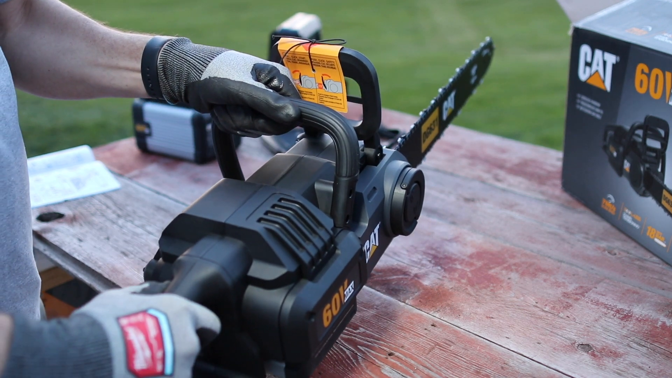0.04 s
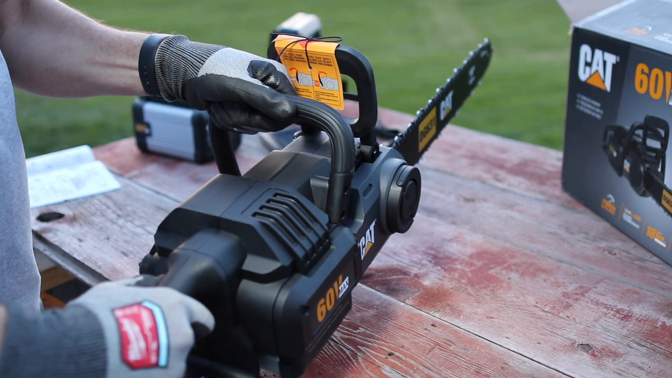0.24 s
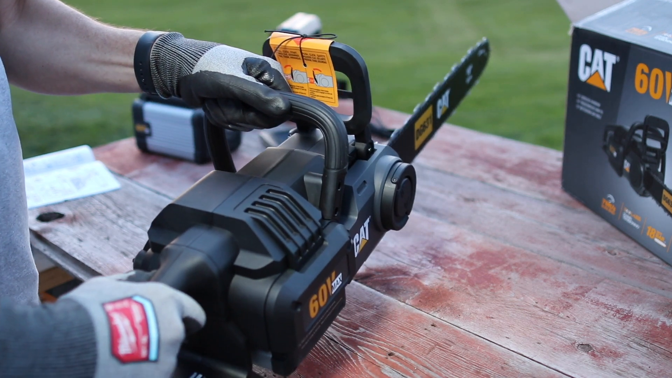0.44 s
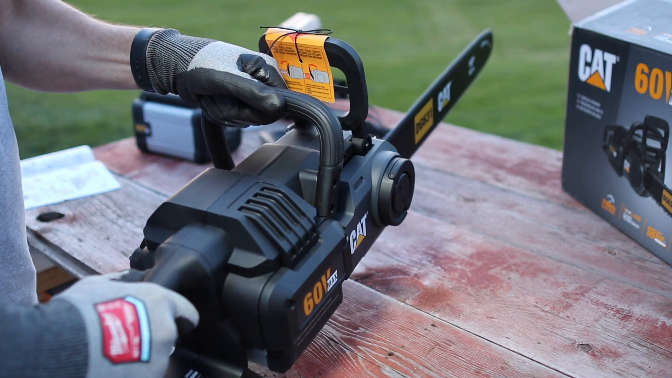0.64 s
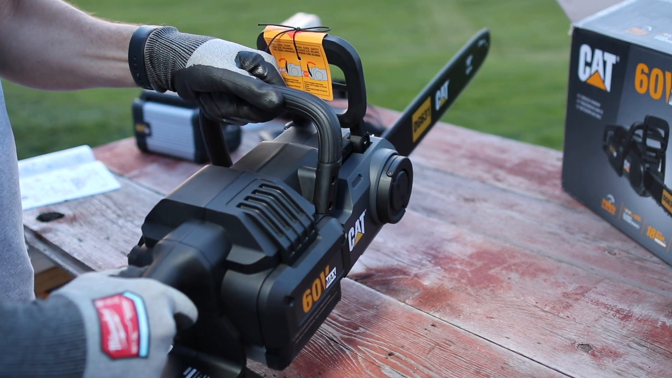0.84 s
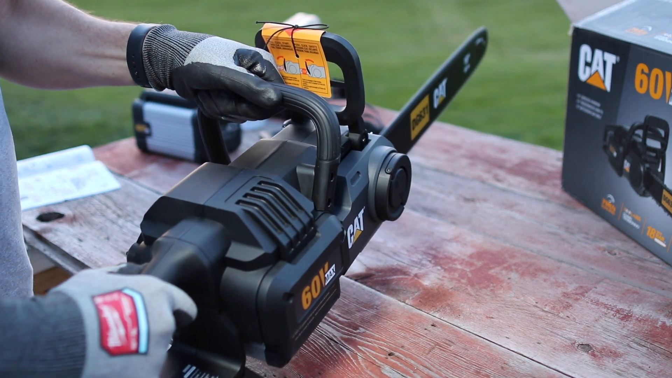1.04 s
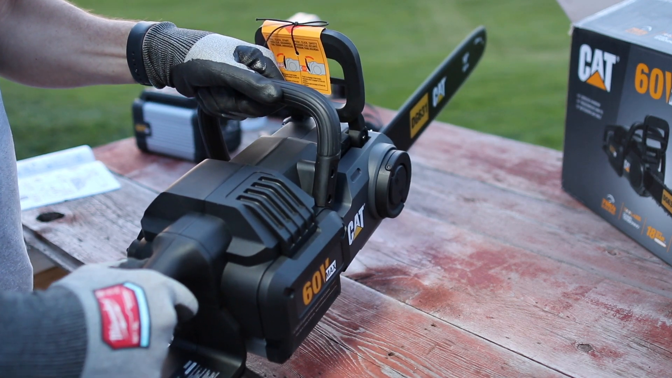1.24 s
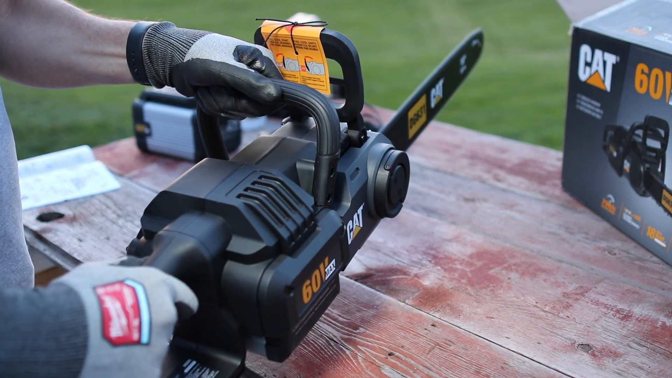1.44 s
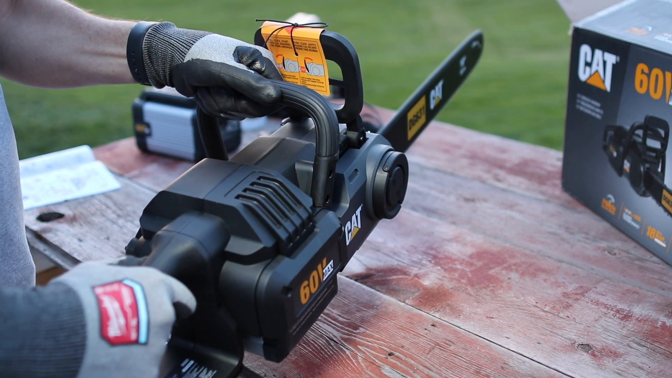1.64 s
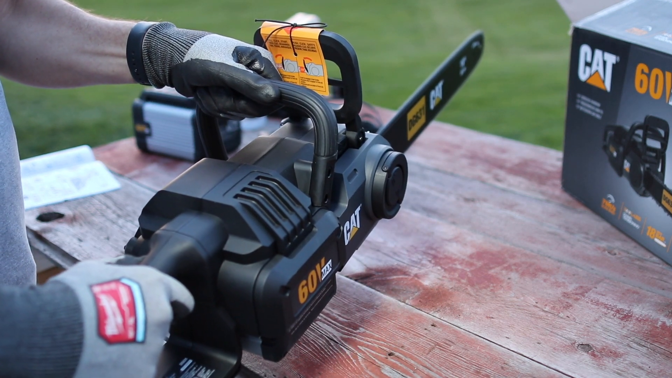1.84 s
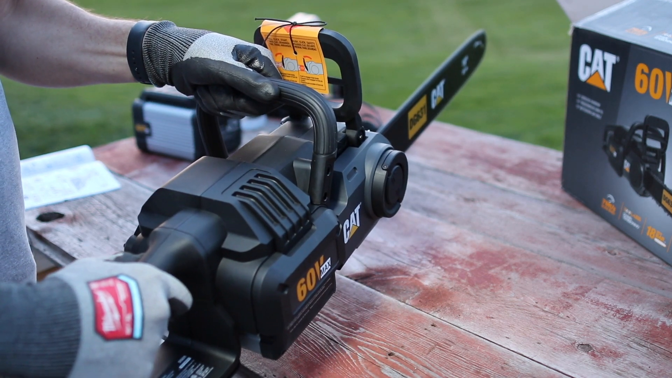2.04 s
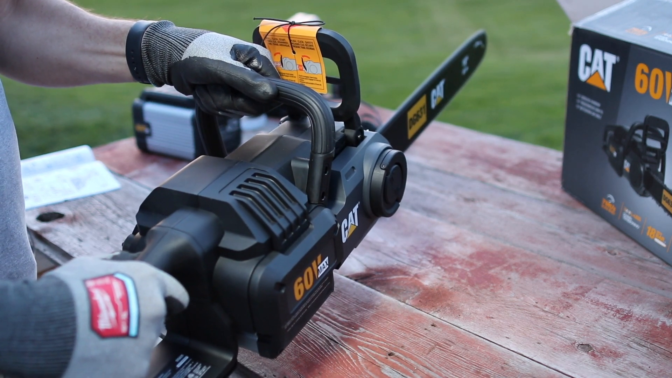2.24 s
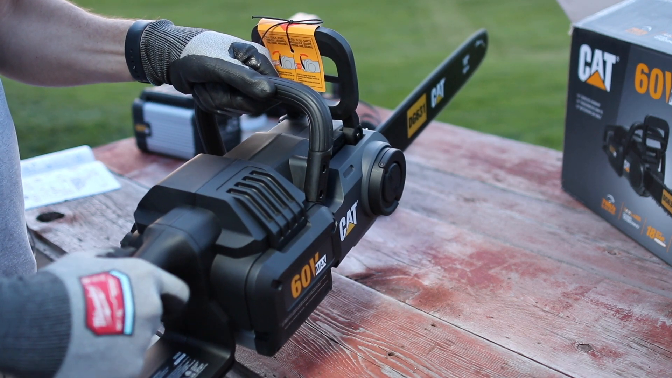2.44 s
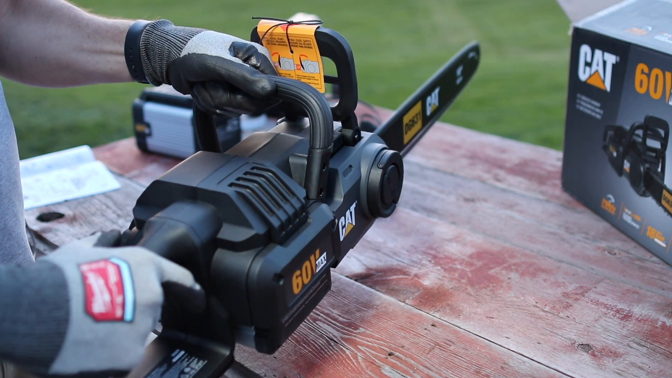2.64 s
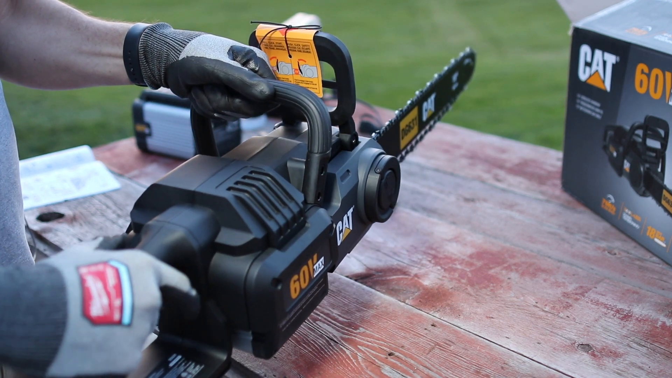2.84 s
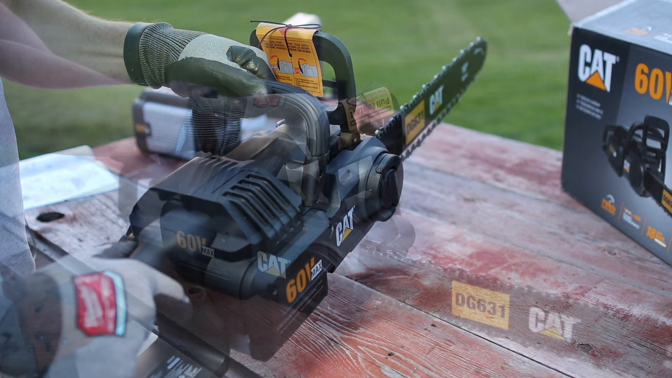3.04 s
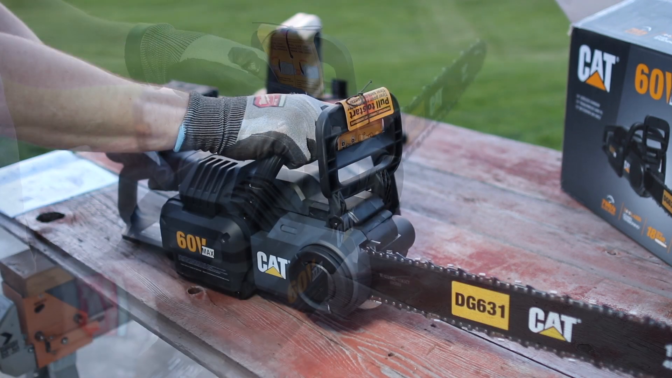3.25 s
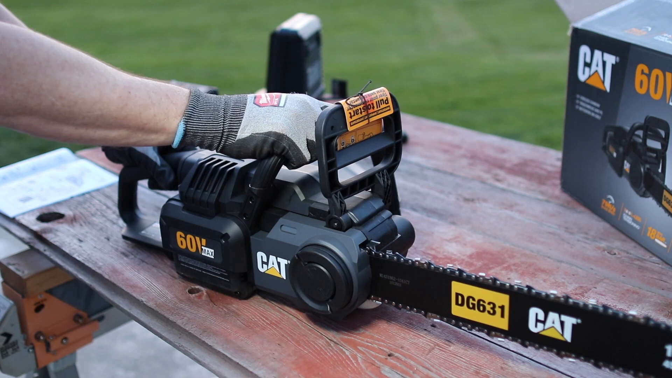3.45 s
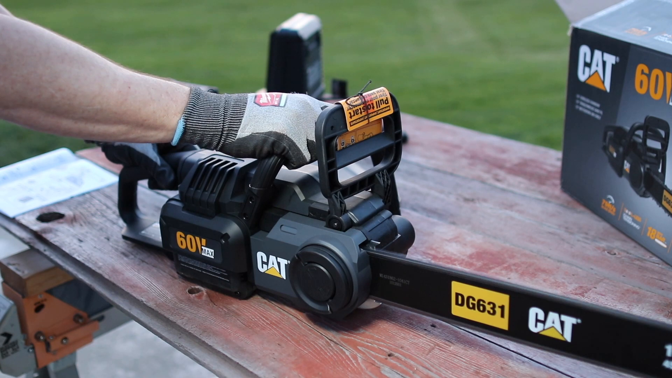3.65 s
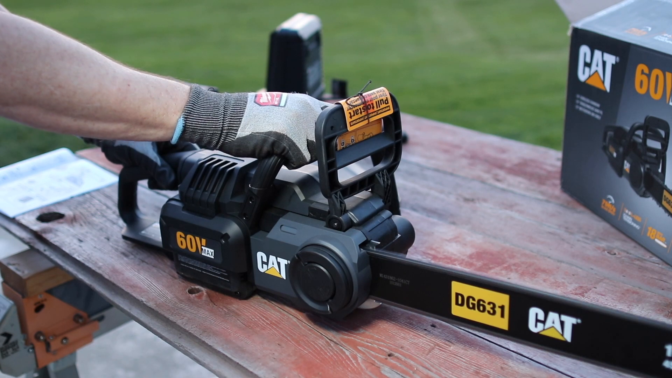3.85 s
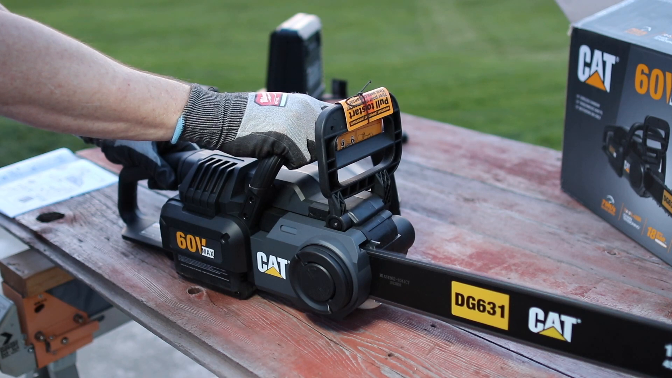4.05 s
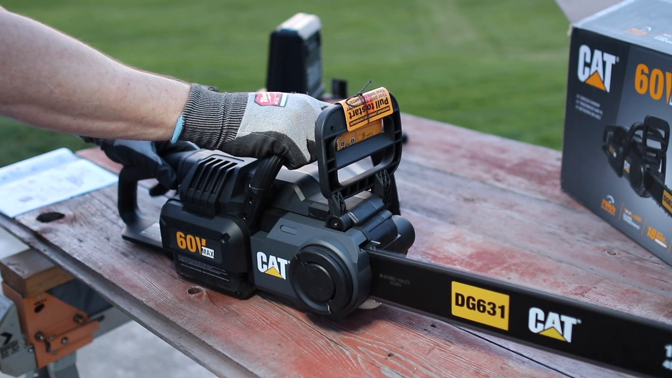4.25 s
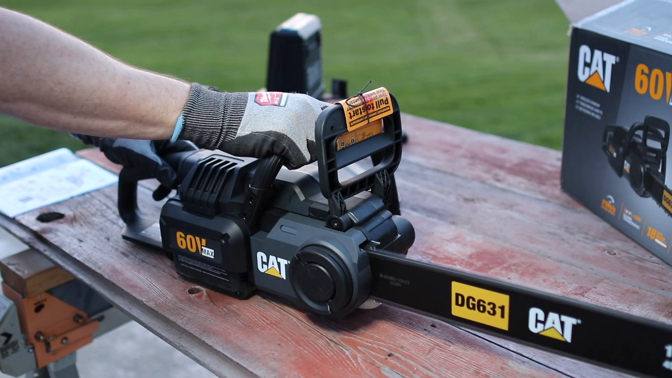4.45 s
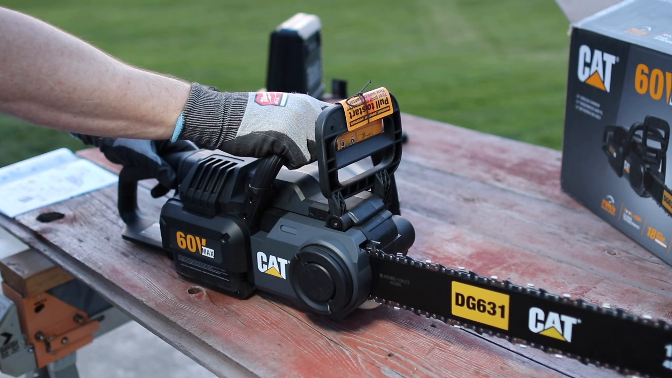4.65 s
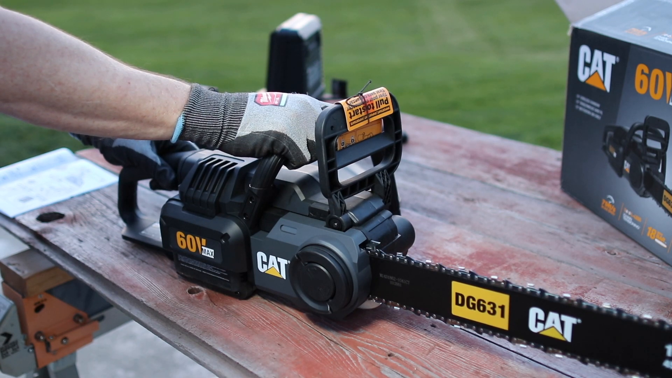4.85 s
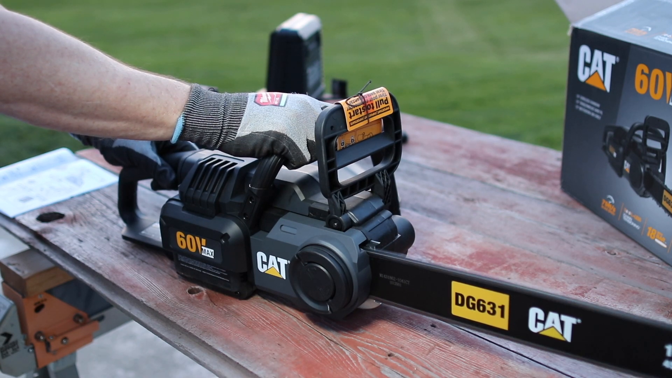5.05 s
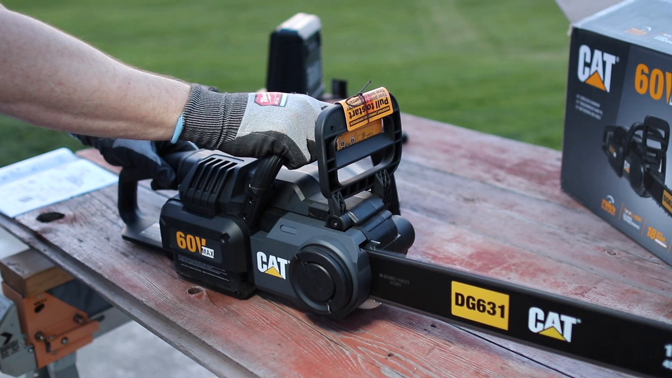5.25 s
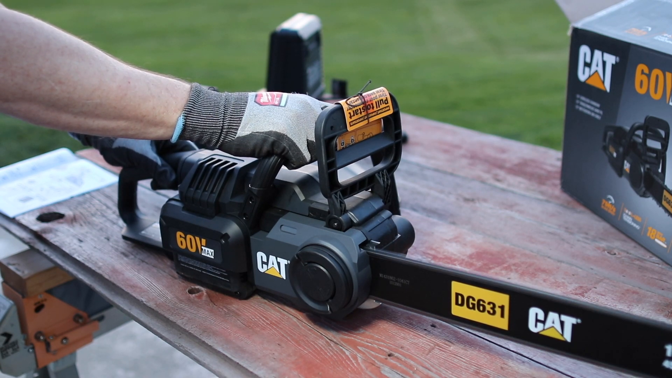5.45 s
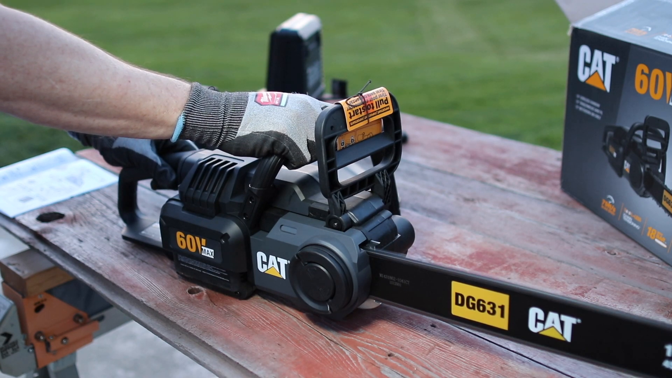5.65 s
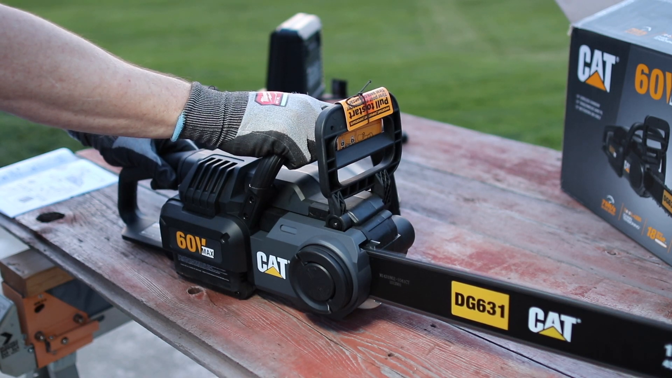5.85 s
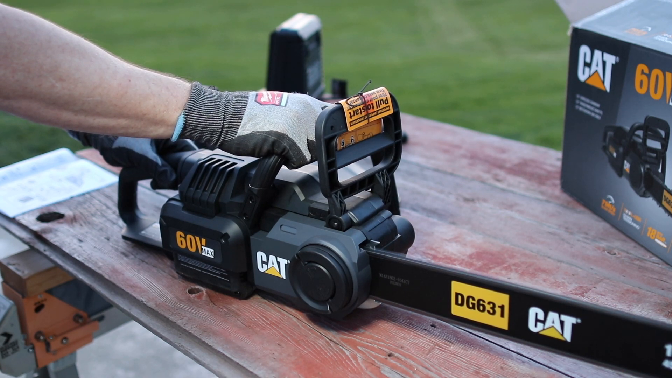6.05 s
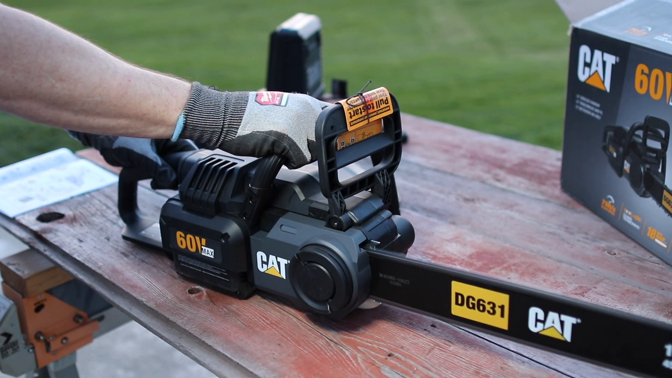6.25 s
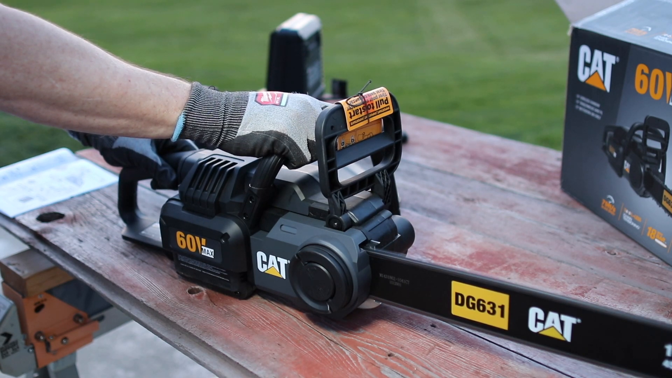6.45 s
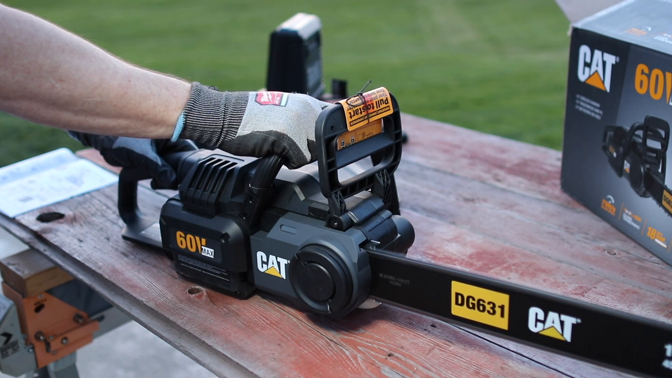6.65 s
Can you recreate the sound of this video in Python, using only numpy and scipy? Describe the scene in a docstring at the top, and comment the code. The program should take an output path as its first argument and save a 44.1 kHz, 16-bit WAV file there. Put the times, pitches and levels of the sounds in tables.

```python
"""Cloth rustle and clicks of catch and trigger, with faint far calls over a quiet yard, open the scene.
A cordless chainsaw on a wooden garden table then runs three times without cutting, heard once from
behind, then twice from the side. Timed link contacts make the rattle, filtered noise the sliding hiss, and
sines the sprocket tones and the motor's whine under drive and braking. Knocks are noise bursts through the
housing's resonances; bar and table ring after each stop, and a dull yard echo follows the saw."""
import sys
import numpy as np
from scipy import signal
from scipy.fft import rfft, irfft
from scipy.io import wavfile
from scipy.ndimage import uniform_filter1d

SR = 44100
rng = np.random.default_rng(int(sys.argv[2]) if len(sys.argv) > 2 else 0)


def digitize_waveform(pressure):
    """Quantize a signal to 16-bit integers and store it at the path in sys.argv[1].

    Rows of a 2-D input are taken as channels; values are limited to [-1, 1].
    """
    field = np.atleast_2d(pressure).T
    bounded = np.clip(field, -1, 1)
    quanta = np.round(bounded * 32767).astype(np.int16)
    wavfile.write(sys.argv[1], SR, quanta)


N = 295853
TIME = np.arange(N) / SR  # s
FREQ = np.maximum(np.arange(2049) * SR / 4096, 1)  # Hz, the grid of every response

LINKS, SPROCKET_TEETH = 62, 6  # drive links in the loop, teeth on the sprocket
SLOT_ORDER = 42  # slot whine, as a multiple of the shaft speed
YARD_DB = -57  # mean level of the open-air background
TOP_HZ = 15850  # upper limit of the recorder
KNOCK_T60_S = 0.035  # decay of the middle band of a knock

# The motor heads for its free speed until held at the top; on release it brakes to a set speed, then coasts.
# All speeds are link rates.
FREE_HZ, SPIN_UP_S, BRAKE_HZ_PER_S, BRAKE_OFF_HZ, SPEED_EASE_S = 3247, 1.55, 3950, 870, 0.05
# The chain creeps before it bites, settles as it runs, quietens as it coasts and dies away once it stops.
CREEP_S, CREEP_DB, SETTLE_DB_PER_S, COAST_DB_PER_S, STOP_DB_PER_S = 0.032, -13, -1.0, -44.5, -550
HISS_SLACK_DB = -1.5  # a slow, loose chain slides more softly

# Resonances of the plastic housing. Each row: centre in Hz, width in Hz, height in dB.
HOUSING_MODES = [(343, 79, 5), (760, 140, 3.5), (986, 160, 2.5), (1327, 170, 5.5), (1900, 180, 3),
                 (2965, 440, 4), (4600, 440, 6.5), (6440, 700, 4)]
# Broad colour of the housing. Each row: frequency in Hz, relative level in dB.
HOUSING_COLOUR = [(50, -12.5), (170, -13.5), (330, -0.5), (700, 2.5), (1000, 6), (2500, -1), (6000, -13),
                  (8500, -20), (15000, -29)]


def undb(db):
    """Decibels to gain."""
    return 10 ** (np.asarray(db) / 20)


def rms(x):
    """Root mean square."""
    return np.sqrt(np.mean(x ** 2)) + 1e-12


def band(x, lo, hi):
    """Steep band-pass from lo to hi in Hz."""
    sos = signal.butter(4, [lo, min(hi, .45 * SR)], "band", fs=SR, output="sos")
    return signal.sosfilt(sos, x)


def walk(rate):
    """Smooth random wandering with a spread near 1, fed by `rate` new values a second."""
    k = int(SR / rate)
    steps = np.repeat(rng.standard_normal(N // k + 1), k)
    slow = uniform_filter1d(uniform_filter1d(steps, k), k)[:N]
    return slow / rms(slow)


def after(s, ramp_s):
    """A smooth step from 0 to 1 around time s."""
    return .5 + .5 * np.tanh((TIME - s) / ramp_s)


def add(out, s, sound):
    """Mix a short sound in at time s."""
    i = int(s * SR)
    out[i:i + len(sound)] += sound[:N - i]


def response(slope, modes=()):
    """A broad slope with resonance bumps and notches on it, in dB at each of FREQ."""
    hz, db = np.transpose(slope)
    bumps = sum(height / (1 + (2 * (FREQ - centre) / width) ** 2) for centre, width, height in modes)
    return np.interp(np.log(FREQ), np.log(hz), db) + bumps


def colour(x, db):
    """Causal filter with the given response, built from its cepstrum."""
    cepstrum = irfft(np.log(undb(db)))
    # folding the cepstrum forward gives minimum phase
    cepstrum[1:len(FREQ) - 1] *= 2
    cepstrum[len(FREQ):] = 0
    impulse = irfft(np.exp(rfft(cepstrum)))
    return signal.fftconvolve(x, impulse)[:len(x)]


def rustles():
    """Gloves and sleeves rub on the handles: soft swells of coloured noise."""
    # Shifts of the grip. Each row: centre in seconds, half length in seconds, level in dB.
    swells = [(0.083, 0.225, -49), (0.415, 0.0536, -48.5), (3.22, 0.085, -51), (3.4, 0.18, -57.5)]
    # Spectrum of the cloth. Each row: frequency in Hz, relative level in dB.
    cloth_slope = [(30, 2.5), (100, -4), (500, -10), (1400, -12.5), (2200, -17), (4000, -18), (6000, -29),
                   (16000, -30.5)]
    cloth = colour(rng.standard_normal(N), response(cloth_slope))
    swell = sum(undb(db) * np.exp(-((TIME - s) / half) ** 2) for s, half, db in swells)
    return cloth / rms(cloth) * swell


def yard(waver=0.019):
    """Outdoor air is coloured noise of wandering level; distant calls are gliding, wavering sines."""
    # Spectrum of the open air. Each row: frequency in Hz, relative level in dB.
    yard_slope = [(15, -28), (25, -5), (49, -4.5), (82, -2.5), (157, -5), (263, -8), (489, -9),
                  (1020, -13.5), (1190, -10), (2050, -20), (4140, -23), (5730, -28), (16000, -33.5)]
    # Far birds and other faint distant tones.
    # Each row: start in seconds, length in seconds, start pitch in Hz, end pitch in Hz, level in dB.
    calls = [(0.01, 0.2, 1420, 1380, -58), (0.07, 0.0363, 4400, 4000, -54.5),
             (0.319, 0.057, 4300, 4000, -55), (0.4, .04, 3950, 3750, -61), (2.92, .12, 162, 155, -54),
             (2.94, 0.32, 1090, 1300, -58.5), (2.948, 0.3, 2850, 3090, -66), (3.261, .035, 4400, 3850, -54),
             (3.427, 0.04, 4440, 3770, -51.5), (3.487, 0.028, 3650, 3950, -53)]
    air = colour(rng.standard_normal(N), response(yard_slope))
    out = air / rms(air) * undb(YARD_DB + 0.66 * walk(8.9))
    wobble = 1 + waver * walk(90)
    for s, length, start_hz, end_hz, db in calls:
        hz = np.linspace(start_hz, end_hz, int(length * SR))
        hz = hz * wobble[int(s * SR):][:len(hz)]
        tone = np.sin(2 * np.pi * np.cumsum(hz) / SR)
        add(out, s, undb(db) * np.sqrt(2) * np.hanning(len(hz)) * tone)
    return out


def knocks(rise_s=0.00012, treble_decay=0.73, bass_decay=1.2):
    """Each knock is a brief chatter of plastic parts ringing the housing; the treble dies first."""
    # Clicks of catch and trigger, and jolts as the drive takes up slack or brakes.
    # Each row: start in seconds, peak level in dB, bass in dB, treble in dB (both set against a middle at -11).
    jolts = [(0.157, -27.5, -7, -12), (0.182, -12, -14.5, -9.5), (0.193, -18, -18, -16.5),
             (0.212, -25, -28.5, -6), (0.454, -15, -16, 0), (0.459, -11, -25, -27),
             (0.465, -0.5, -10, -20.5), (0.505, -4, -29, -25), (2.544, -8, -26, -20),
             (2.62, -21.5, -7, -13), (2.833, -39, -7, -1.5), (2.883, -48, -15, -4), (2.93, -42, -18, -25.5),
             (3.069, -37.5, -31, -23), (3.19, -36, -13, -6), (3.197, -37, -12, -11),
             (3.239, -11.5, -32, -10.5), (3.512, -19, 8, 2), (3.516, -1, -17, -33), (3.539, -8.5, -16, -21),
             (4.789, -38, -13, -21.5), (4.825, -15.5, -24.5, -12), (4.836, -14.5, -23.5, -14.5),
             (4.933, -28, -19, -8), (4.943, -13.5, -4, -34), (4.989, -17, -18, -18)]
    out, t = np.zeros(N), TIME[:SR // 6]
    body = response(HOUSING_COLOUR, HOUSING_MODES)
    for s, peak_db, bass_db, treble_db in jolts:
        knock = 0
        bands = [(40, 680, bass_db, bass_decay), (700, 2630, -11, 1), (2900, 12500, treble_db, treble_decay)]
        for lo, hi, db, decay in bands:
            envelope = (1 - np.exp(-t / rise_s)) * np.exp(-np.log(1000) * t / (KNOCK_T60_S * decay))
            chatter = rng.standard_normal(len(t)) * envelope
            part = band(colour(chatter, body), lo, hi)
            knock = knock + undb(db) * part / rms(part)
        add(out, s, undb(peak_db) * knock / abs(knock).max())
    return out


def squeals(width_hz=450, buzz_db=-33):
    """The drive pulses the windings to find the rotor: a thin high squeal over a soft buzz of the housing."""
    # Squeals around each spin-up. Each row: start in seconds, length in seconds, pitch in Hz, level in dB.
    bursts = [(0.449, 0.056, 11860, -34), (3.509, 0.043, 11400, -42.5), (4.937, 0.0213, 11100, -59.5)]
    out = np.zeros(N)
    for s, length, hz, db in bursts:
        noise = rng.standard_normal(int(length * SR))
        squeal = band(noise, hz - width_hz / 2, hz + width_hz / 2)
        buzz = colour(noise, response(HOUSING_COLOUR, HOUSING_MODES))
        both = undb(db) * squeal / rms(squeal) + undb(buzz_db) * buzz / rms(buzz)
        add(out, s, both * signal.windows.tukey(len(noise), .2))
    return out


def radiation(slope, modes, bounce, bounce_ms):
    """The saw's response with the bounce off the table top, 0 dB in the rattle band."""
    comb = abs(1 + bounce * np.exp(-2j * np.pi * FREQ * bounce_ms / 1000))
    db = response(slope, modes) + 20 * np.log10(comb)
    return db - 20 * np.log10(rms(undb(db[(FREQ > 1400) & (FREQ < 3500)])))


def link_rate(start, release, top_hz, coast_hz_per_s):
    """Drive links passing the sprocket each second, and the moment when the brake lets go."""
    driven = np.minimum(FREE_HZ * (1 - np.exp(-(TIME - start) / SPIN_UP_S)), top_hz)
    brake_off = release + (top_hz - BRAKE_OFF_HZ) / BRAKE_HZ_PER_S
    braked = BRAKE_HZ_PER_S * (np.clip(TIME, release, brake_off) - release)
    coasted = coast_hz_per_s * np.maximum(TIME - brake_off, 0)
    hz = np.maximum(driven - (braked + coasted), 20)
    return uniform_filter1d(hz, int(SPEED_EASE_S * SR)), brake_off


def motor(hz, driving, braking, body, axis, slot_db, jitter=0.0045, inrush_db=7):
    """Slots whine under drive, most at low speed; braking orders sing as they fall through resonances."""
    # Braking whine, each order swelling at a resonance of the motor. Each row: multiple of the shaft speed,
    # resonance in Hz, half width in Hz, level from the rear in dB, level from the side in dB.
    brake_orders = [(6.015, 1080, 250, -33, -27.5), (13.93, 2613, 460, -23.5, -26),
                    (13.62, 2110, 150, -23.5, -16), (26.87, 4870, 250, -20.5, -37.5),
                    (26.3, 4050, 190, -24.5, -43.5), (34.64, 5450, 230, -24.5, -47),
                    (44, 6650, 230, -19.5, -40), (53.2, 7880, 280, -22, -49.5)]
    shaft = hz / SPROCKET_TEETH
    turn = 2 * np.pi * np.cumsum(shaft * (1 + jitter * walk(300))) / SR
    slots_db = slot_db + inrush_db * (1 - hz / hz.max()) + np.interp(SLOT_ORDER * shaft, FREQ, body)
    slots = undb(slots_db) * np.sin(SLOT_ORDER * turn)
    whine = 0
    for order, centre, half, *levels in brake_orders:
        swell = np.exp(-((order * shaft - centre) / half) ** 2)
        whine = whine + undb(levels[axis]) * swell * np.sin(order * turn)
    return np.sqrt(2) * (driving * slots + braking * whine)


def contacts(travel, scatter, count):
    """Each link ticks several times on its way round; the pattern returns every lap, scattered in size."""
    place = rng.uniform(0, LINKS, LINKS * count)
    habit = rng.standard_normal(len(place))
    laps = np.arange(int(travel[-1] / LINKS) + 1)[:, None]
    size = (habit + scatter * rng.standard_normal((len(laps), len(place)))).ravel()
    at = np.interp((place + LINKS * laps).ravel(), travel, np.arange(N))
    # share each tick between its two nearest samples
    first, part = at.astype(int), at % 1
    early = np.bincount(first, size * (1 - part), N + 1)
    late = np.bincount(first + 1, size * part, N + 1)
    return (early + late)[:N]


def chain(hz, on, body, hiss_db, slap_db, slap_hz, scatter, low_db):
    """Rattle of the links and their sliding hiss, with the rattle near 0 dB."""
    slack = 1 - hz / hz.max()
    travel = np.cumsum(hz * (1 + .0005 * walk(25))) / SR  # in links
    ticks = colour(contacts(travel, scatter, count=14) / np.sqrt(hz), body)
    rattle = band(ticks, 1400, 3700)
    low = undb(low_db) * band(ticks, 25, 1400)
    # a slow chain hangs loose and slaps the bar, which brings up its low resonances
    slaps = colour(contacts(travel, scatter, count=4) / np.sqrt(hz), body)
    slap = band(slaps, *slap_hz) * slack ** 1.1
    rattle = (rattle + low) / rms(rattle[on]) + undb(slap_db) * slap / rms(slap[on])
    # steel slides in the groove, a little harder as each cutter passes, once in two links
    cutters = 1 + 0.17 * np.sin(np.pi * travel)
    slide = colour(rng.standard_normal(N) * cutters * undb(0.83 * walk(90)), body)
    hiss = band(slide / rms(slide) + .8 * ticks / rms(ticks[on]), 3700, 19000)
    return rattle + hiss * undb(hiss_db + HISS_SLACK_DB * slack) / rms(hiss[on])


def mesh(hz, coasting, voice, axis, waver_db, coast_db, flap=0.04, flap_db=3.0, loose_db=4):
    """Links seat on the sprocket: multiples sing at resonances, louder and rougher as the chain slackens."""
    # Multiples of the link rate that sing; every second link carries a cutter, hence the halves.
    chain_orders = [.5, 1, 1.5, 2, 3, 4]
    # Strength of each of these multiples. Each row: from the rear in dB, from the side in dB.
    strengths = [(-11.5, -5.5), (-5.5, -2.5), (-20, -16), (-8, -3), (-17.5, -7), (-22.5, -10)]
    slack = 1 - hz / hz.max()
    travel = np.cumsum(hz * (1 + 0.00074 * walk(25.2))) / SR + flap * slack * walk(150)
    seating_db = loose_db * slack + coast_db * coasting
    out = 0
    for order, levels in zip(chain_orders, strengths):
        waver = (waver_db + flap_db * slack) * walk(30)
        strength = levels[axis] + np.interp(order * hz, FREQ, voice) + seating_db + waver
        tone = np.sin(2 * np.pi * (order * travel + rng.random()))
        out = out + undb(strength) * np.sqrt(2) * tone
    return out


def rings(stop, rise_s=0.0054):
    """Bar and table ring on after the chain stops, as decaying sines."""
    # Ringing of bar and table. Each row: frequency in Hz, level in dB, time to fall 60 dB in seconds.
    bar_modes = [(176.2, -47.5, 0.36), (280, -50.5, 0.63), (700, -55, 0.84), (1124, -53.5, 0.97)]
    t = np.maximum(TIME - stop, 0)
    tones = sum(undb(db - 60 * t / t60) * np.sin(2 * np.pi * hz * t) for hz, db, t60 in bar_modes)
    return (1 - np.exp(-t / rise_s)) * tones


def run(row, top_hz, body, coupling, axis, slap_hz, scatter, low_db, waver_db, coast_tone_db, slot_db):
    """One pull of the trigger: spin up, hold, brake, coast, stop. Axis 0 is the rear of the saw, 1 its side."""
    start, bite, release, stop, coast_hz_per_s, build_s, rattle_db, hiss_db, slap_db, coast_db = row
    hz, brake_off = link_rate(start, release, top_hz, coast_hz_per_s)
    since = lambda s: np.maximum(TIME - s, 0)
    released, coasting = after(release, .006), after(brake_off, .006)
    creep = undb(CREEP_DB) * after(bite - CREEP_S, 0.0018)
    attack = np.maximum(1 - np.exp(-since(bite) / build_s), creep)
    fade_db = SETTLE_DB_PER_S * since(bite) + coast_db * coasting
    fade_db = fade_db + COAST_DB_PER_S * since(brake_off) + STOP_DB_PER_S * since(stop)
    on = (TIME > bite) & (TIME < stop)
    links = chain(hz, on, body, hiss_db, slap_db, slap_hz, scatter, low_db)
    tones = mesh(hz, coasting, body + response(coupling), axis, waver_db, coast_tone_db)
    whine = motor(hz, attack * (1 - released), released - coasting, body, axis, slot_db)
    return attack * undb(rattle_db + fade_db) * (links + tones) + whine + rings(stop)


def echo(x, t60, wet_db, dull_hz=1500):
    """Dull scatter from the house wall and the garden: a decaying, low-passed noise tail."""
    t = TIME[:SR]
    tail = rng.standard_normal(SR) * np.exp(-np.log(1000) * t / t60) * (t > .012)
    low_pass = signal.butter(2, dull_hz, fs=SR, output="sos")
    tail = signal.sosfilt(low_pass, tail / np.linalg.norm(tail))
    return undb(wet_db) * signal.fftconvolve(x, tail)[:N]


def scene():
    """One run heard from behind and two from the side, with their clicks, the same in both channels."""
    # How the saw radiates to the rear and to the side. Each row: frequency in Hz, relative level in dB.
    rear_slope = [(60, -30), (150, -24), (300, -19), (600, -13), (1000, -12), (2200, -1.94), (3600, -12),
                  (7000, -10.5), (12000, -14), (15500, -18.5)]
    side_slope = [(60, -29), (150, -15), (300, -15), (600, -4), (1000, -1.5), (2200, -4.5), (3600, -14.5),
                  (7000, -8.5), (12000, -9), (15500, -15.5)]
    # Resonances and notches of bar and housing. Each row: centre in Hz, width in Hz, height in dB.
    rear_modes = [(377, 230, 5.5), (474, 49, -5), (616, 21, 2.5), (766.7, 110, 4.5), (1057, 180, 11),
                  (1327, 90, -4), (1516.4, 43, 6), (1820, 54, -4), (2350, 490, -5), (2981, 81, -2.5),
                  (6150, 720, -3), (7712, 610, -5.5)]
    side_modes = [(305, 46, 0), (882, 61, -6.5), (1150, 70.5, -17), (1196, 484, 11), (1478, 350, -9),
                  (1955, 87.5, -6.5), (2166, 39.2, -6.5), (2662, 43.6, 7), (3075, 140, -5), (4124, 118, -5),
                  (4620, 3100, 8), (6450, 146, -15)]
    # How strongly the sprocket drives the housing. Each row: frequency in Hz, strength in dB.
    rear_coupling = [(170, -29), (290, -7.5), (375, 5), (450, -2.5), (560, 1), (630, -2), (760, 0.5),
                     (900, -3.5), (1070, 1.5), (1260, 0), (1400, -2), (1540, 0.5), (1800, 3.5), (2150, -1),
                     (2450, -12.5), (5000, -15)]
    side_coupling = [(110, -18), (165, -1), (230, -10), (560, -10), (620, 3), (670, -10.5), (790, -0.5),
                     (1000, 2.5), (1290, 1.5), (1400, -1.5), (1620, -4), (1780, 0), (2350, 0.5),
                     (2500, -9.5), (3300, -6), (5000, -2.5)]
    # Pulls of the trigger. Each row: spin-up starts, chain bites, trigger released, chain stops (all in
    # seconds), coasting loss in Hz per second, build-up in seconds, rattle in dB, hiss over rattle in dB,
    # slap over rattle in dB, change on coasting in dB.
    runs = [(0.429, 0.49, 2.533, 2.783, 2250, 0.035, -22, 1, -9.5, -4.5),
            (3.523, 3.556, 4.271, 4.492, 3900, 0.0056, -24, 1, 2, 0),
            (4.946, 4.98, 7.0, 7.3, 3900, 0.013, -24.5, 1.71, -1.5, -3)]
    # Link rate in Hz at which the motor is held, one value for each run.
    held_hz = [1254, 1195, 1240.3]
    rear = radiation(rear_slope, rear_modes, bounce=.1, bounce_ms=0.3602)
    side = radiation(side_slope, side_modes, bounce=0.251, bounce_ms=0.417)
    behind = run(runs[0], held_hz[0], rear, rear_coupling, axis=0, slap_hz=(320, 1400), scatter=1.54,
                 low_db=0.5, waver_db=2.5, coast_tone_db=2, slot_db=-35.5)
    beside = sum(run(row, top_hz, side, side_coupling, axis=1, slap_hz=(620, 1400), scatter=1.05,
                     low_db=-1.5, waver_db=-0.6, coast_tone_db=0.0, slot_db=-46)
                 for row, top_hz in zip(runs[1:], held_hz[1:]))
    saw = behind + beside + knocks() + squeals() + rustles()
    # turned side-on, the saw throws more of its sound into the yard
    yard_echo = echo(behind, t60=0.37, wet_db=-23.5) + echo(beside, t60=0.28, wet_db=-15.5)
    mono = saw + yard_echo + yard()
    return np.array([mono, mono])


def record(dry):
    """The recorder clips peaks at full scale, then a steep low-pass cuts the top."""
    low_pass = signal.ellip(10, .2, 80, TOP_HZ, fs=SR, output="sos")
    return signal.sosfilt(low_pass, np.clip(dry, -1, 1))


dry = scene()
out = record(dry)
digitize_waveform(out)
```